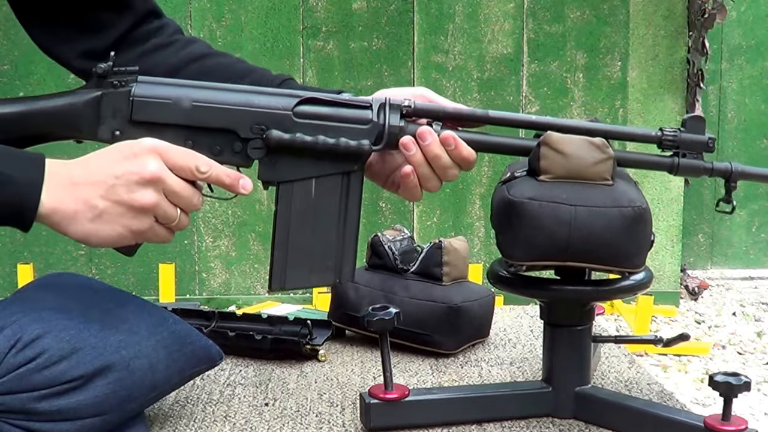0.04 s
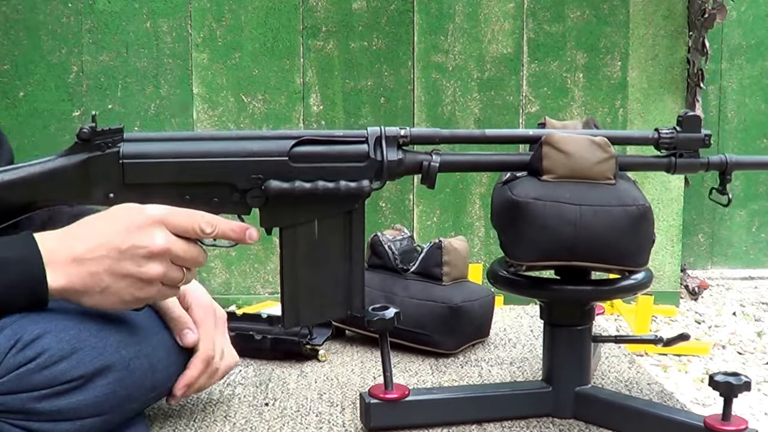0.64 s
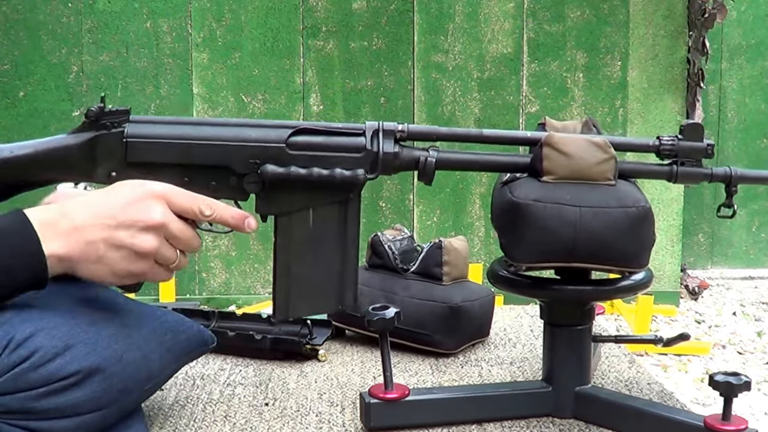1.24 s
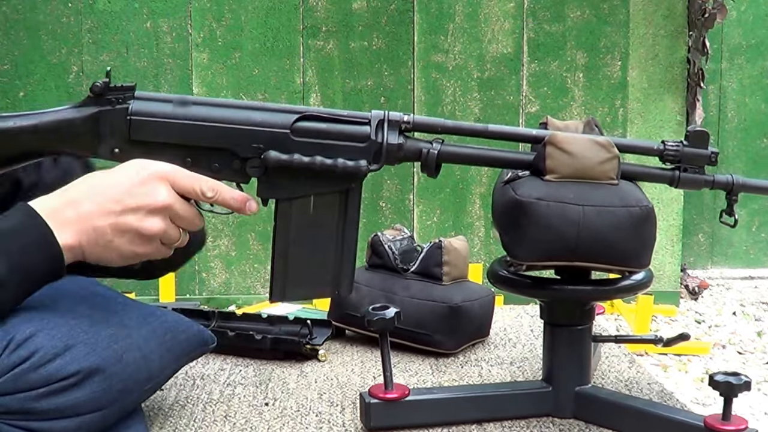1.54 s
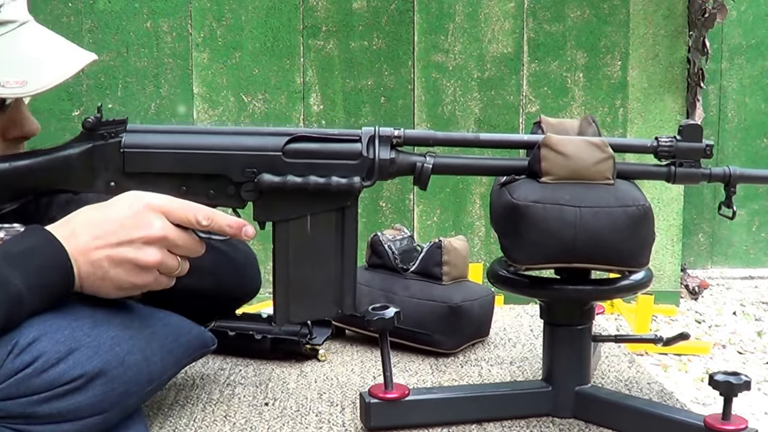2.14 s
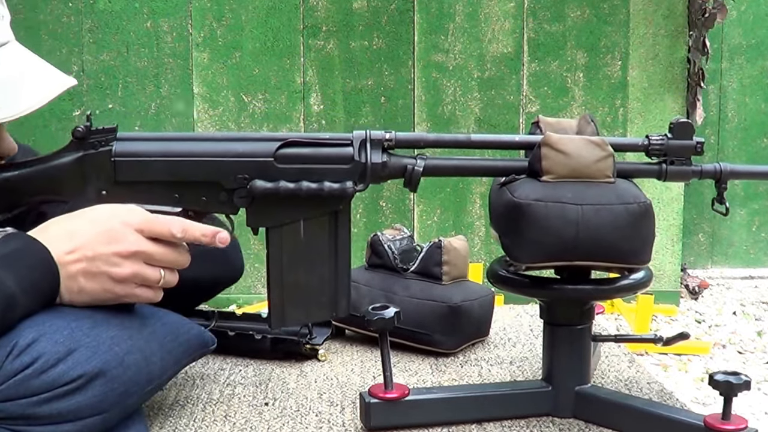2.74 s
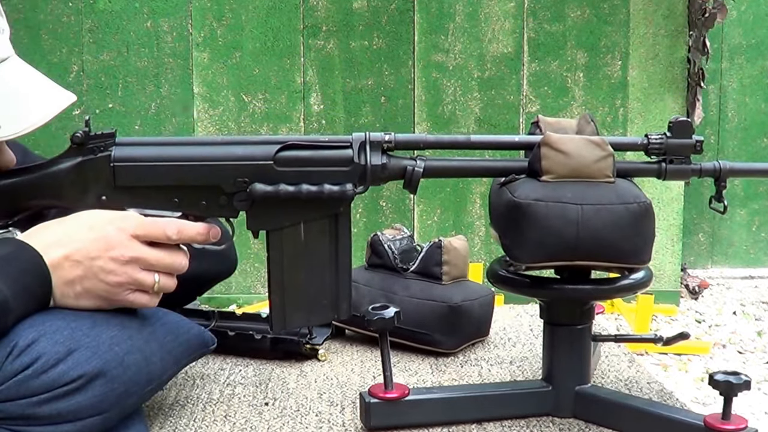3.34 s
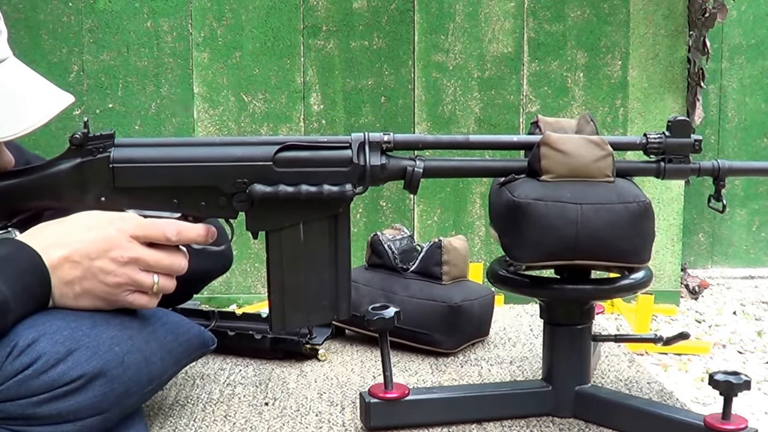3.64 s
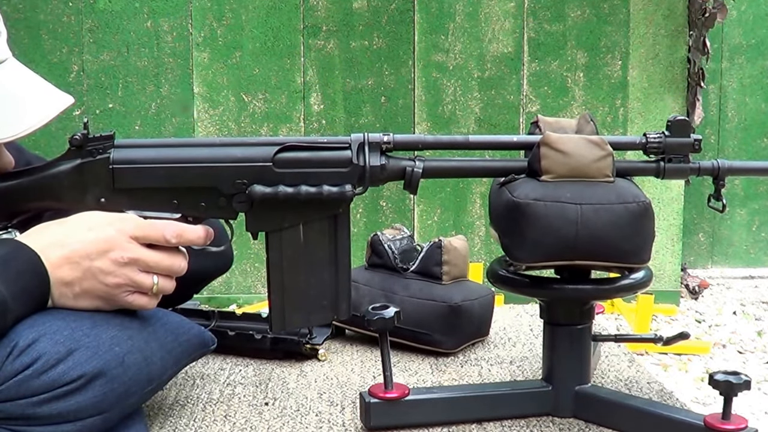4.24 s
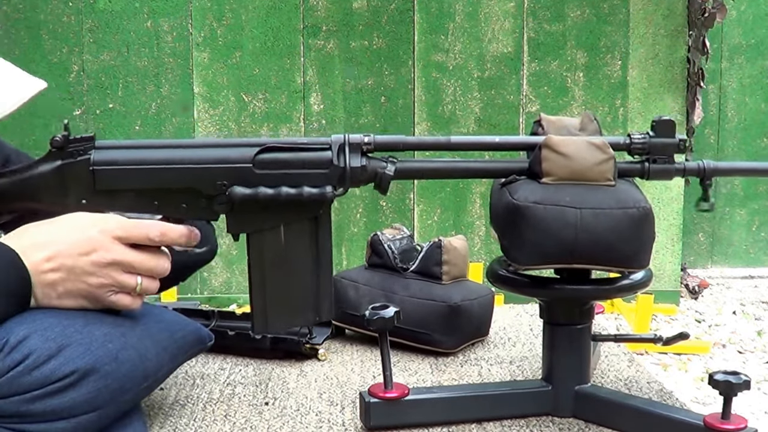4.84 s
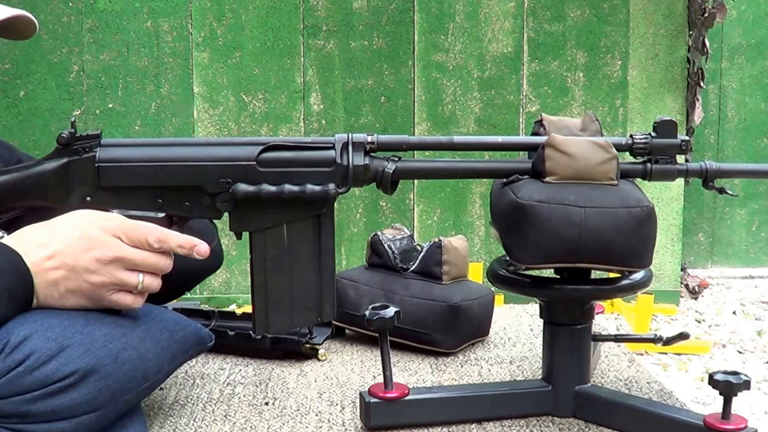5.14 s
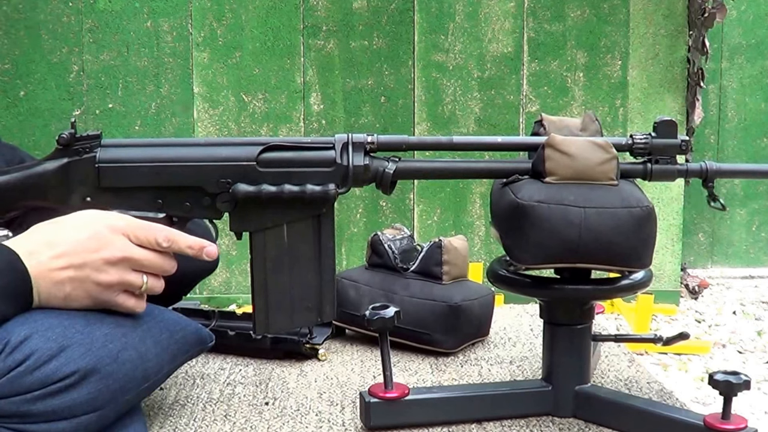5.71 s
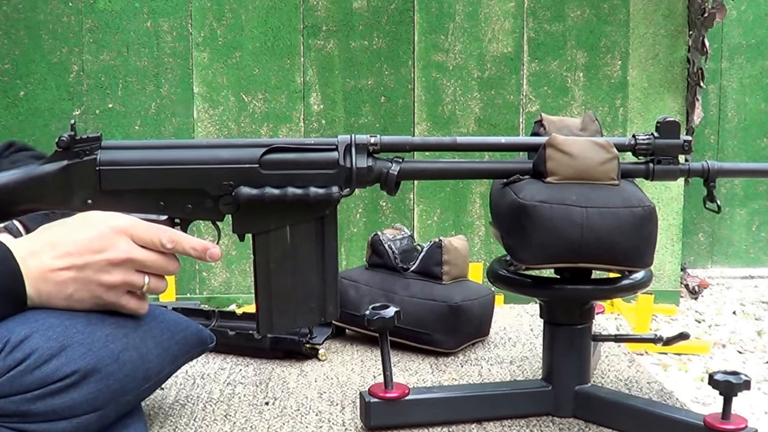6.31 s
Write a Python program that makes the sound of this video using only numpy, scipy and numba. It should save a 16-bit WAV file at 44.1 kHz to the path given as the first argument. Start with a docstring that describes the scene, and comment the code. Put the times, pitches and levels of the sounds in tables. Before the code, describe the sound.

Soft metal clicks and bumps as a rifle is settled, then one loud echoing shot and the clink of its empty case.

```python
"""A self-loading rifle is settled on a sandbag on a wooden bench: sleeves rub, steel parts ring and
click, and the boards thump. The shooter holds still, the trigger ticks, and one shot overloads the
microphone. The walled lane echoes; the camera's limiter (an automatic volume control) holds the roar
flat before it dies away. Meanwhile the sling swivel starts to swing and tick, and the empty case
clatters and lands. Quiet outdoor air and the camera's thin whine lie under it all."""
import sys
import numpy as np
from scipy import signal
from scipy.fft import rfft, irfft, next_fast_len
from scipy.io import wavfile
from scipy.ndimage import uniform_filter1d
from numba import njit

SR = 44100
rng = np.random.default_rng(int(sys.argv[2]) if len(sys.argv) > 2 else 0)


def materialize(psi):
    """Save the field psi as 16-bit PCM at rate SR to the path in sys.argv[1].

    A 1-D psi becomes a single channel; in a 2-D psi each row is a channel.
    """
    bounded = np.clip(np.atleast_2d(psi).T, -1, 1)
    quanta = np.round(bounded * 32767).astype(np.int16)
    wavfile.write(sys.argv[1], SR, quanta)


N = 285327


# The muzzle blast, as the overloaded microphone passes it: start_s, length_s, level_db, pitch_hz
BLASTS = [(4.6519, 0.0026, 8.5, 11800), (4.6583, 0.013, 29, 8950)]
def shot(echo, echo_start_s=4.660, echo_db=24):
    """Two harsh bursts of noise with their peaks squashed, then the roar of the lane."""
    out = np.zeros((2, N))
    t = np.arange(SR // 10) / SR
    for start_s, length_s, db, hz in BLASTS:
        burst = band(band(noise(len(t), side_db=-4.5), hz, 1.2 * hz), hz, 1.4 * hz)
        rasp = np.tanh(1.1 * level(burst, 0))  # the overload
        rise = np.minimum(t / (0.088 * length_s), 1)
        fall = fade(np.maximum(t - length_s, 0), 2.6 * length_s)
        add(out, start_s, peak_level(rasp * rise * fall, db))
    add(out, echo_start_s, echo * undb(echo_db))
    return out


# The lane's echo (fade_s is the time to drop 60 dB): pitch_hz, level_db, fade_s, build_up_s
ECHO_BANDS = [(39.3, -19.5, 0.86, 0.0099), (90, -20, 0.78, 0.014), (157, -3.5, 0.69, 0.089),
              (242, -0.5, 0.83, 0.026), (445, 0.5, 0.89, 0.015), (972, -6, 0.84, 0.0095),
              (1630, -8.5, 1.18, 0.0025), (2130, -9, 1.25, 0.0081), (3400, -10, 1.06, 0.0083),
              (4520, -15, .92, 0.007), (6800, -14, 0.77, 0.0021), (10600, -15.5, 0.48, 0.0024),
              (16000, -29, 0.39, .002)]
# How the echo leans to one side: pitch_hz, left_minus_right_db
ECHO_LEAN = [(100, 0), (400, -2), (700, 4.5), (1300, -2), (4500, -2), (14000, 0)]
def lane_echo():
    """Sound bounces between the walls: low notes build up late, and the air soaks up the highest first."""
    t = np.arange(2 * SR) / SR
    wash = noise(len(t), side_db=-0.5) * undb(flutter(len(t), 200))  # echoes come in bunches
    out = 0
    for hz in 2 ** np.arange(5, 14.4, 1 / 3):  # three bands to the octave
        part = colour(wash, lambda f: np.maximum(1 - 3 * np.abs(np.log2((f + 1e-3) / hz)), 0))
        swell = (1 - np.exp(-t / look_up(ECHO_BANDS, hz, column=3))) ** 2
        lean_db = look_up(ECHO_LEAN, hz) * np.array([[.5], [-.5]])
        gain = undb(look_up(ECHO_BANDS, hz) + lean_db)
        out = out + gain * part * swell * fade(t, look_up(ECHO_BANDS, hz, column=2))
    return out / np.sqrt(np.mean(out[:, :SR // 10] ** 2))


# Clicks and scrapes of the moving parts, magazine and stock: start_s, level_db, pitch_hz, fade_s
HANDLING_CLICKS = [(0.303, -35, 9100, 0.017), (0.3618, -20, 5400, 0.032), (0.387, -32, 6200, 0.029),
                   (0.666, -38, 4600, 0.033), (0.709, -35.5, 2600, 0.036), (0.7426, -33, 5100, 0.069),
                   (0.7685, -34, 5370, 0.019), (0.777, -30.5, 3830, 0.052), (0.801, -37, 5000, 0.045),
                   (0.8877, -42, 6600, 0.01), (0.9124, -33, 5600, 0.19), (1.0874, -30, 4320, 0.076),
                   (1.178, -30.5, 4650, 0.032), (1.5441, -22.5, 4970, 0.0091), (1.5923, -26, 5700, 0.017),
                   (1.5977, -24.5, 6150, 0.015), (1.6608, -26.5, 3600, 0.014), (1.6841, -36, 4900, 0.015),
                   (1.751, -29.5, 5040, 0.021), (1.9004, -35, 2600, 0.063), (2.268, -45, 8200, 0.081),
                   (2.934, -47, 8800, 0.017), (3.0978, -43, 4560, 0.011), (3.329, -51, 5800, 0.025),
                   (3.5929, -28.5, 8040, 0.02), (3.654, -44, 10000, 0.015), (3.8485, -48.5, 7450, 0.029),
                   (3.885, -45.5, 8800, 0.014), (4.282, -49.5, 7250, 0.24)]
# Knocks on a small steel fitting near the front: start_s, level_db, brightness_db_per_octave
FITTING_KNOCKS = [(0.156, -29.5, -6), (.1712, -14, 3), (.1850, -18.5, 5.5), (0.192, -34, -3),
                  (2.502, -38, -1)]
# The notes of that fitting, a small spring and the trigger: pitch_hz, level_db, fade_s
FITTING_NOTES = [(2780, -11, 0.06), (3840, -13.5, 0.054), (4813, -19.5, 0.12), (7255, -8.5, 0.26),
                 (8046, -2.5, 0.115), (10565, -3.5, 0.11), (12870, -6, 0.06), (13705, -11, 0.14),
                 (14612, -9, 0.059)]
SPRING_NOTES = [(8113, -11, .14), (10850, -2, .13), (12220, -13, .13)]
TRIGGER_NOTES = [(2900, 0, .05)]
def rifle_parts():
    """Steel parts click and ring, a spring pings as the grip shifts, and the trigger lets go."""
    out = np.zeros((2, N))
    for start_s, db, hz, fade_s in HANDLING_CLICKS:
        add(out, start_s, peak_level(click(hz, fade_s), db))
    for start_s, db, brightness in FITTING_KNOCKS:
        add(out, start_s, peak_level(ring(FITTING_NOTES, brightness), db))
        add(out, start_s, peak_level(click(9000, fade_s=.03, width=1.2), db - 13))
    add(out, start_s=1.105, sound=peak_level(ring(SPRING_NOTES), db=-37.5))
    add(out, start_s=4.613, sound=peak_level(ring(TRIGGER_NOTES), db=-51.5))
    return out


# Where the rifle's steel body rings: pitch_hz, width_hz, level_db
STEEL_BODY = [(894, 670, 5.5), (1760, 250, 0), (3705, 470, -1), (4970, 560, -8), (6370, 1900, -6.5),
              (8700, 500, -10), (10800, 470, -7.5), (12400, 700, -3.5)]
# A light, high click is narrower than a heavy, low one: pitch_hz, width_over_pitch
CLICK_WIDTHS = [(2500, 2.4), (5200, 2.1), (6500, 1.2), (8000, 0.47)]
def click(hz, fade_s, width=None):
    """Steel meets steel: a gritty touch shakes the rifle's body and leaves a faint ring."""
    if width is None:
        width = look_up(CLICK_WIDTHS, hz)
    t = np.arange(SR // 5) / SR
    grit = undb(3.5 * flutter(len(t), 24))
    shape = (1 - np.exp(-t / .0008)) * (fade(t, fade_s) + undb(-29) * fade(t, .16))
    contact = noise(len(t), side_db=-9.5) * grit * shape
    body = sum(undb(db) * band(contact, pitch_hz, width_hz) for pitch_hz, width_hz, db in STEEL_BODY)
    return band(contact + body, hz, width * hz)


# The notes of the bench's boards: pitch_hz, level_db, fade_s
BOARD_NOTES = [(107, -22, 0.081), (155, 5, 0.12), (181, 2.5, 0.071), (238.6, -1.5, 0.093),
               (309.3, -3.5, 0.23), (394, -13, 0.079), (481.5, -3.5, 0.084), (553, 0, 0.05),
               (700, -6, 0.093), (882, -0.5, 0.021), (1100, -19, 0.12), (1307, -12.5, 0.13)]
# Bumps on the bench: start_s, level_db, pitch_hz, width_octaves, loss_per_bounce_db
BENCH_BUMPS = [(0.3626, -21.5, 683, 0.54, 26), (0.3672, -18.5, 178, 0.58, 37), (.4680, -38, 850, 0.84, 30),
               (0.581, -40.5, 400, 2.4, 30), (.6635, -30, 543, 0.32, 32), (.7100, -32, 1140, 0.97, 4.5),
               (.9140, -33.5, 800, 0.95, 25), (1.088, -27.5, 1080, 0.76, 8.5),
               (1.389, -41.5, 336, 0.89, 28), (1.75, -27.5, 360, 1.4, 22), (1.9050, -24.5, 393, 0.83, 9.5),
               (1.984, -38, 457, 0.16, 18), (2.5570, -40, 624, 0.92, 30), (2.5800, -43, 680, 0.98, 32),
               (2.6900, -43.5, 630, 0.92, 30), (3.0050, -39.5, 980, 0.7, 30)]
def bench(hits=4, bounce_s=0.0395):
    """The rifle bumps the bench and rocks: each hit thuds and rings the board notes near its pitch."""
    out = np.zeros((2, N))
    t = np.arange(SR // 2) / SR
    rise = 1 - np.exp(-t / 0.0007)
    for start_s, db, hz, octaves, loss_db in BENCH_BUMPS:
        notes = [(f, note_db - 4 * (np.log2(f / hz) / octaves) ** 2, fade_s)
                 for f, note_db, fade_s in BOARD_NOTES]
        boards = peak_level(ring(notes), 0)
        width_hz = 1.38 * octaves * hz
        for k in range(hits):
            push = noise(len(t), side_db=-16) * fade(t, 0.081)
            thud = peak_level(band(band(push, hz, width_hz), hz, width_hz), 1)
            add(out, start_s + k * bounce_s, peak_level((boards + thud) * rise, db - k * loss_db))
    return out


# The empty case clattering away: start_s, level_db, pitch_hz, fade_s
CASE_CLATTER = [(5.063, -10, 6860, 0.038), (5.2890, -23.5, 5900, 0.25)]
# What rings when it lands: pitch_hz, level_db, fade_s
LANDING_NOTES = [(1280, 1, 0.062), (1330, 9.3, 0.039), (1610, 4.5, 0.092)]
def empty_case():
    """The fired case clinks twice, then hits the boards."""
    out = np.zeros((2, N))
    for start_s, db, hz, fade_s in CASE_CLATTER:
        clink = band(click(hz, fade_s, width=0.33), hz, 0.34 * hz)
        add(out, start_s, peak_level(clink, db))
    add(out, start_s=5.512, sound=peak_level(ring(LANDING_NOTES), db=-16))
    return out


# Loose rattles of the swivel, besides its regular ticks: start_s, level_db
SWIVEL_RATTLES = [(4.975, -9), (5.4200, -36), (6.352, -48)]
def sling_swivel(turns=9, first_s=5.027, turn_s=0.1595, quicken_s=0.0011, first_db=-25, loss_db=2.5):
    """The rifle's kick swings the strap's metal loop; it ticks at each turn, ever quicker and softer."""
    out = np.zeros((2, N))
    ticks = [(first_s + k * turn_s - quicken_s * k * (k - 1) / 2, first_db - k * loss_db)
             for k in range(turns)]
    for start_s, db in ticks + SWIVEL_RATTLES:
        tick = band(click(13300, fade_s=0.012, width=1.0), hz=9500, width_hz=15000)
        add(out, start_s, peak_level(tick, db))
    return out


# Strokes of sleeve and sandbag: start_s, length_s, level_db
CLOTH_STROKES = [(0.15, 0.26, -42.5), (0.481, 0.046, -40.5), (0.538, 0.13, -44.5), (0.677, 0.15, -42.5),
                 (0.802, 0.18, -42.5), (.97, 0.15, -47), (1.08, 0.074, -40), (1.186, 0.06, -41.5),
                 (1.477, 0.4, -52), (2.38, 0.27, -53.5)]
# The tone of rubbing cloth: pitch_hz, level_db
CLOTH_TONE = [(80, -7), (150, -8), (414, -4), (720, -6), (2060, -10.5), (4400, -12), (7600, -6.5),
              (11000, -10.5), (16000, -19)]
def rubbing(still_from_s=3.4, fidget_db=-51.5, fall_db_per_s=2, snags_per_s=9.4):
    """Cloth catches and slips in strokes, over faint fidgeting that dies away as the shooter settles."""
    t = np.arange(N) / SR
    power = undb(fidget_db - fall_db_per_s * t) ** 2 * (t < still_from_s)
    for start_s, length_s, db in CLOTH_STROKES:
        arch = np.maximum(np.sin(np.pi * np.clip((t - start_s) / length_s, 0, 1)), 0)
        power = power + (undb(db) * arch ** 0.3) ** 2
    crackle_db = 2.0 * flutter(N, 700) + 2.7 * flutter(N, 30)
    fibres = noise(N, side_db=-8) * undb(crackle_db)
    cloth = level(colour(fibres, lambda f: undb(look_up(CLOTH_TONE, f))), 0)
    for place, size in rng.random((int(snags_per_s * still_from_s), 2)):
        above_cloth_db = 1.5 + 5 * (2 * size - 1)
        add(cloth, place * still_from_s, peak_level(click(7500, fade_s=.014), above_cloth_db))
    return cloth * np.sqrt(power)


# The tone of the outdoor air: pitch_hz, level_db
AIR_TONE = [(25, -3), (70, -4.5), (140, -14), (250, -5.5), (500, -6.5), (760, -2), (1080, -6),
            (1900, -10.5), (4300, -13.5), (8500, -17), (15000, -21)]
def background(air_db=-53.5, whine_hz=15625, whine_db=-66):
    """A steady hush of outdoor air and the camera's thin whine."""
    air = colour(noise(N, side_db=1.0), lambda f: undb(look_up(AIR_TONE, f)))
    whine = np.sin(2 * np.pi * whine_hz * np.arange(N) / SR)
    return level(air, air_db) + level(whine, whine_db)


# How unlike the two microphones sound: pitch_hz, side_minus_mid_db
STEREO_WIDTH = [(35, -2), (100, -16), (400, -7), (1300, -3.5), (4500, -4.5), (8000, -4), (12000, -11.5),
                (16000, -23)]
def noise(size, side_db):
    """Hiss at two microphones: mid is what they share, side is what sets them apart."""
    mid, side = rng.standard_normal((2, size))
    side = colour(side, lambda f: undb(look_up(STEREO_WIDTH, f) + side_db))
    return np.array([mid + side, mid - side])


def ring(notes, brightness=0):
    """A struck object rings with its own notes; brightness (dB per octave) lifts the high ones."""
    t = np.arange(SR // 2) / SR
    out = 0
    for hz, db, fade_s in notes:
        phase = rng.uniform(0, 2 * np.pi) + 0.052 * rng.standard_normal((2, 1))  # sides out of step
        shape = fade(t, fade_s) * (1 - np.exp(-2 * hz * t))  # about one cycle to get going
        gain = undb(db + brightness * np.log2(hz / notes[0][0]))
        out = out + gain * shape * np.sin(2 * np.pi * hz * t + phase)
    return out


def undb(db):
    """Turn decibels into a number to multiply by."""
    return 10 ** (np.asarray(db) / 20)


def look_up(table, hz, column=1):
    """Read a table at any pitch, sliding between its rows."""
    rows = np.array(table)
    return np.interp(np.log(hz + 1e-3), np.log(rows[:, 0]), rows[:, column])


def colour(sound, gain):
    """Turn each pitch up or down by gain(hz)."""
    size = next_fast_len(sound.shape[-1])
    hz = np.arange(size // 2 + 1) * SR / size
    return irfft(rfft(sound, size) * gain(hz), size)[..., :sound.shape[-1]]


def band(sound, hz, width_hz):
    """A ringing filter that keeps the pitches near hz."""
    angle = 2 * np.pi * min(hz, .45 * SR) / SR
    damping = np.sin(angle) * width_hz / hz / 2
    return signal.lfilter([damping, 0, -damping], [1 + damping, -2 * np.cos(angle), 1 - damping], sound)


def fade(t, fade_s):
    """Die away by 60 dB every fade_s."""
    return np.exp(-np.log(1000) * t / fade_s)


def flutter(size, samples):
    """A smooth random wobble that changes over the given number of samples."""
    return level(uniform_filter1d(uniform_filter1d(rng.standard_normal(size), samples), samples), 0)


def level(sound, db):
    """Set the average (rms) level."""
    return sound * undb(db) / np.sqrt(np.mean(sound ** 2))


def peak_level(sound, db):
    """Set the level of the loudest 4 milliseconds."""
    power = uniform_filter1d(np.mean(sound ** 2, axis=0), 176, mode="constant")
    return sound * undb(db) / np.sqrt(power.max())


def add(out, start_s, sound):
    """Mix a sound in at start_s."""
    i = int(start_s * SR)
    out[:, i:i + sound.shape[1]] += sound[:, :N - i]


def scene():
    """The handling is close and a little to the left; small sounds stir only the start of the echo."""
    echo = lane_echo()
    short_echo = echo * fade(np.arange(echo.shape[1]) / SR, 0.71)
    short_echo /= np.sqrt(np.sum(short_echo ** 2) / 2)
    handling = (rifle_parts() + bench() + rubbing()) * undb([[1], [-1]])
    near = handling + empty_case() + sling_swivel()
    walls = signal.fftconvolve(near, short_echo, axes=1)[:, :N]
    return near + undb(-19) * walls + shot(echo) + background()


@njit
def volume_cut(over_db, release_s):
    """The limiter's cut, in dB, jumps up at once and lets go slowly."""
    keep = np.exp(-1 / (release_s * SR))
    out, cut = np.empty(len(over_db)), 0.
    for i in range(len(over_db)):
        cut = max(over_db[i], cut * keep)
        out[i] = cut
    return out


def record(dry, ceiling_db=-12.0, low_cut_hz=72, top_hz=15800):
    """The limiter holds the loud part flat; then the deepest bass and highest treble are cut."""
    power = uniform_filter1d(np.mean(dry ** 2, axis=0), size=160)
    over_db = 10 * np.log10(np.maximum(power, 1e-12)) - ceiling_db
    fast_db = volume_cut(over_db, release_s=0.38)
    slow_db = volume_cut(0.24 * over_db, release_s=0.88)  # the last few dB come back slowly
    limited = dry * undb(-np.maximum(fast_db, slow_db))
    limited = signal.sosfilt(signal.butter(2, low_cut_hz, "high", fs=SR, output="sos"), limited)
    return signal.sosfilt(signal.ellip(8, .2, 80, top_hz, fs=SR, output="sos"), limited)


dry = scene()
out = record(dry)
materialize(out)
```